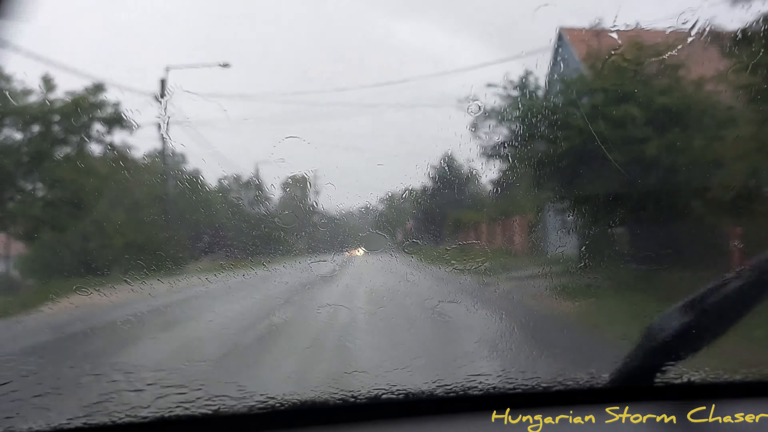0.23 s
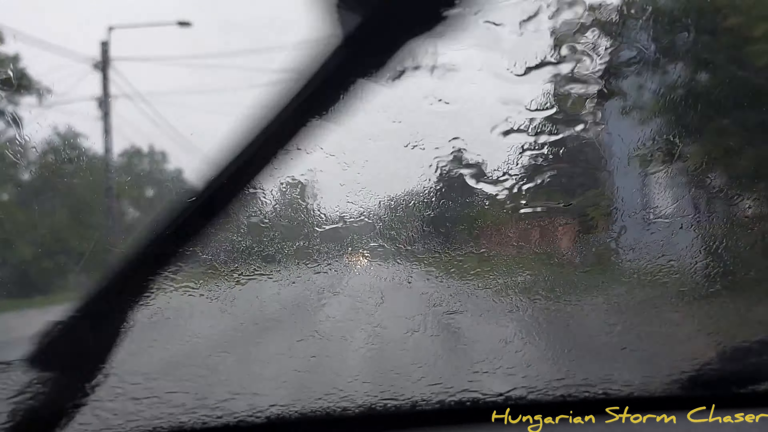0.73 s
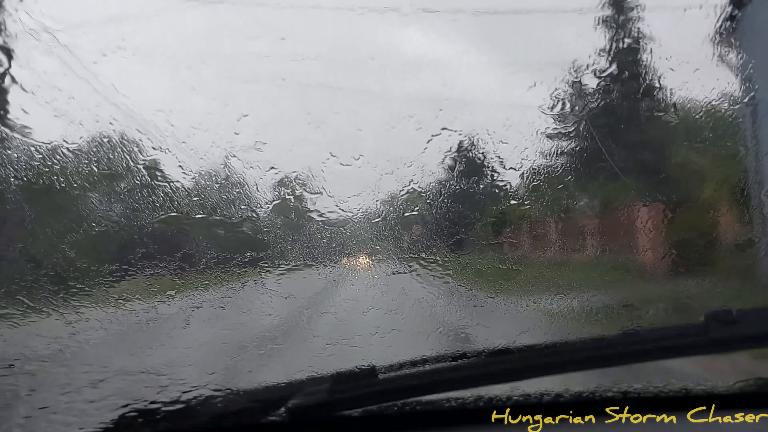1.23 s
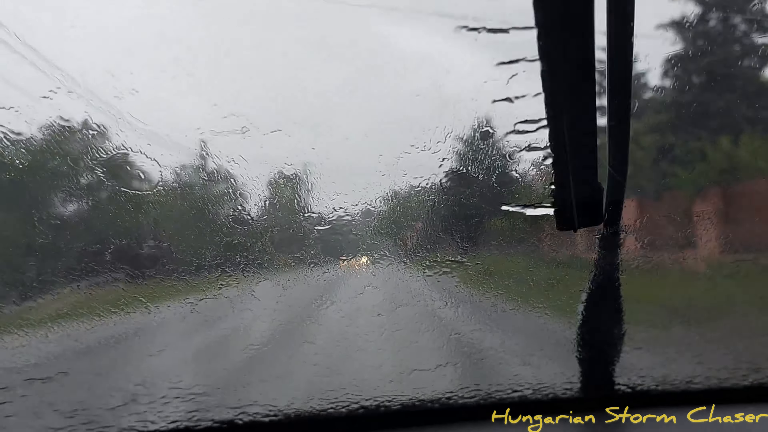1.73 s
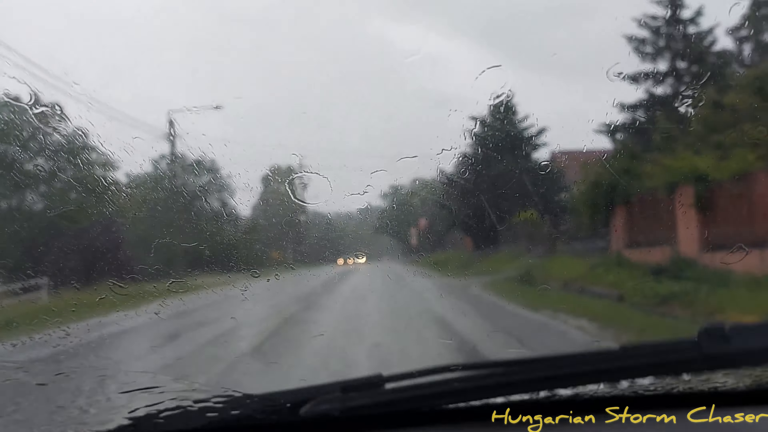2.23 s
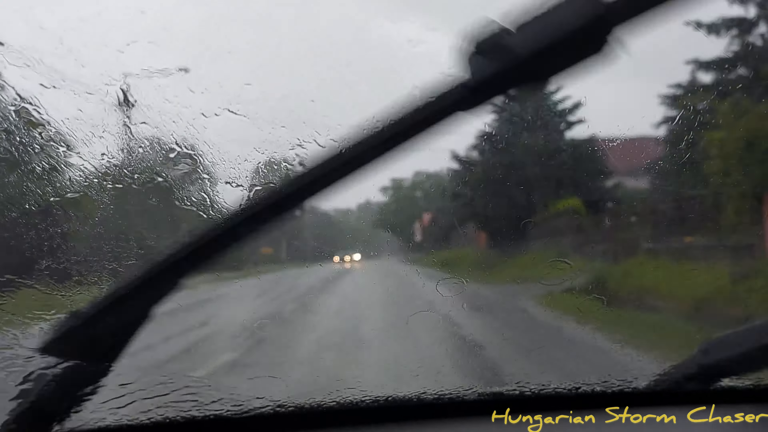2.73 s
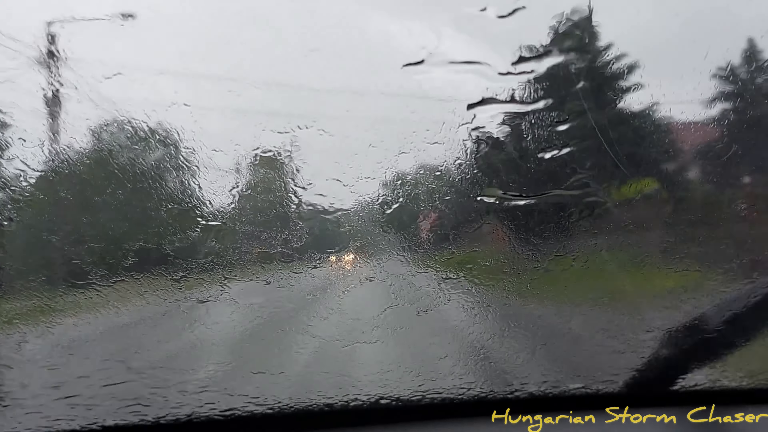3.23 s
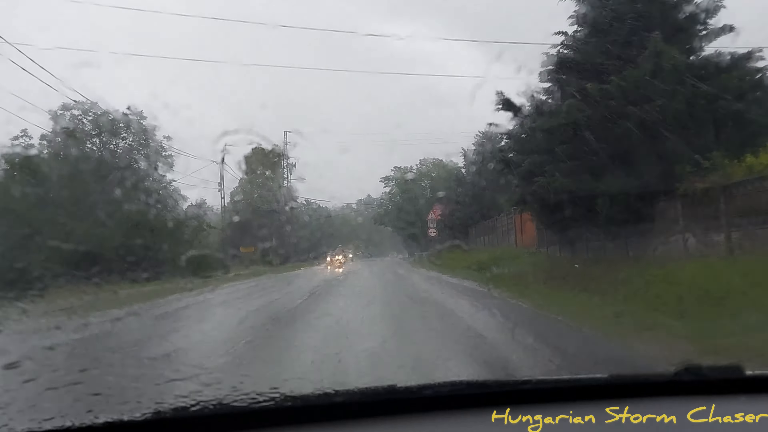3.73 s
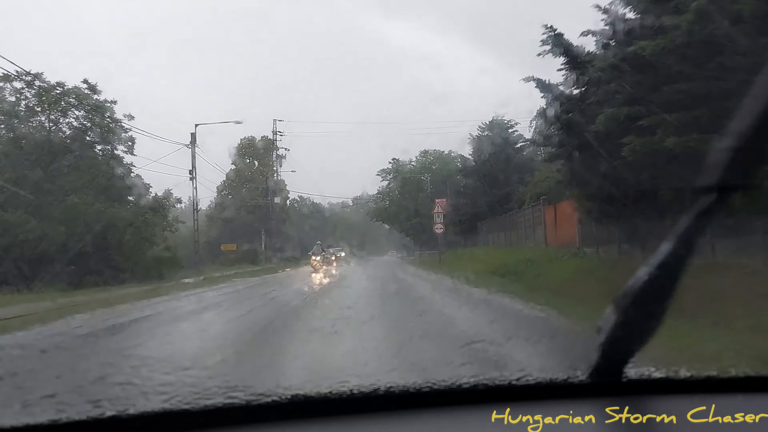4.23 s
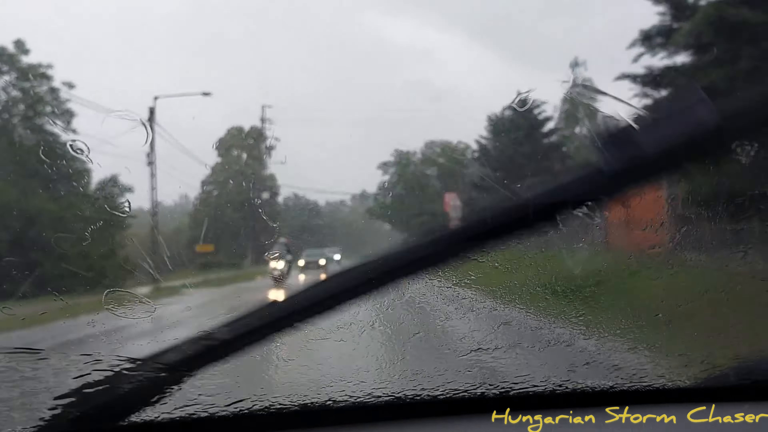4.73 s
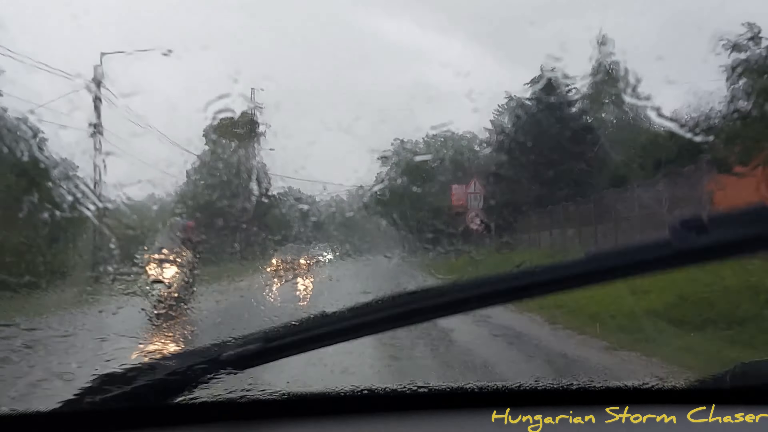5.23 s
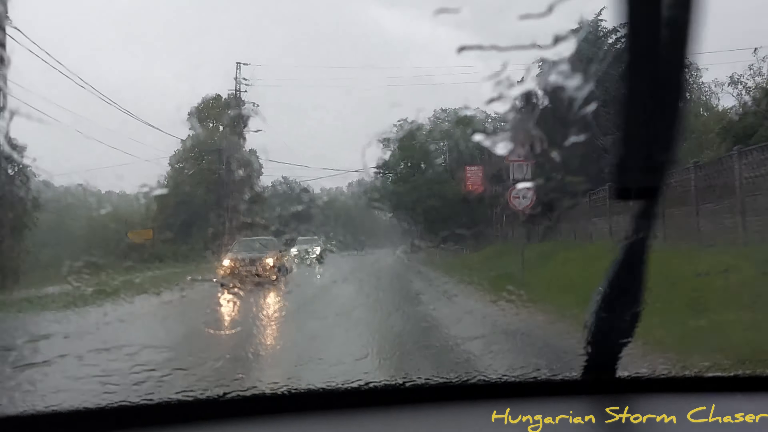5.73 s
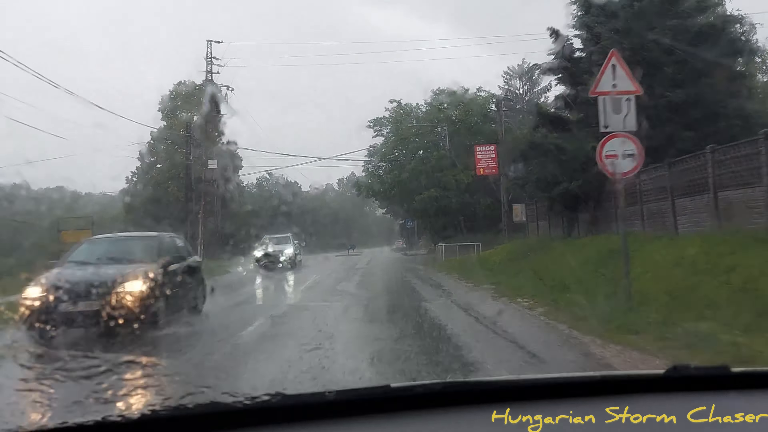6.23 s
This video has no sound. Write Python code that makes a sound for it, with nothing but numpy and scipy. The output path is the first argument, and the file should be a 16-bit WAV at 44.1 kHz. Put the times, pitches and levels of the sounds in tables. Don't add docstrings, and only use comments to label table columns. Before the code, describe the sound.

Inside a cruising car, dense raindrops crackle and tap on glass and panels above a deep engine hum, with soft hollow knocks and wiper hum.

```python
import sys
import numpy as np
from scipy import signal
from scipy.fft import rfft, irfft, next_fast_len
from scipy.io import wavfile
from scipy.ndimage import uniform_filter1d

SR = 44100
rng = np.random.default_rng(int(sys.argv[2]) if len(sys.argv) > 2 else 0)


def volts_from_db(level):
    exponent = np.asarray(level, float) / 20
    return 10 ** exponent


def to_wav(sig):
    pcm = np.clip(np.atleast_2d(sig), -1, 1) * 32767
    pcm = np.round(pcm).astype(np.int16)
    wavfile.write(sys.argv[1], SR, pcm.T)


N = 285327
TIME = np.arange(N) / SR
SIZE = next_fast_len(N + SR // 2)
FREQ = np.arange(SIZE // 2 + 1) * SR / SIZE + 1e-3


def unit(x):
    return x / np.sqrt(np.mean(x ** 2))


def curves(table):
    s, *columns = np.transpose(table)
    return [np.interp(TIME, s, column) for column in columns]


def on_freq(table):
    hz, value = np.transpose(table)
    return np.interp(np.log(FREQ), np.log(hz), value)


def walk(rate_hz):
    hold = int(SR / rate_hz)
    held = np.repeat(rng.standard_normal(N // hold + 1), hold)
    smooth = uniform_filter1d(uniform_filter1d(held, hold), hold)
    return unit(smooth[:N])


def swell(s, length_s):
    return np.maximum(1 - ((TIME - s) / length_s) ** 2, 0) ** 2


def resonances(modes):
    power = 0
    for hz, width_hz, db in modes:
        power = power + volts_from_db(2 * db) / (1 + (2 * (FREQ - hz) / width_hz) ** 2) ** 2
    return np.sqrt(power)


def scattered(per_s, level_db, spread_db):
    chance = rng.random((int(per_s * N / SR), 2))
    s = chance[:, 0] * TIME[-1]
    return s, level_db[(s * SR).astype(int)] + spread_db * (chance[:, 1] - .5)


# time in seconds [s], patter level [dB], spray minus
# patter [dB].
RAIN = [(0, -34.5, -9.5), (.18, -40, -9), (.27, -35, -9), (.5, -38, -10.5), (.85, -34.5, -8.5),
        (1.1, -38, -10), (1.35, -36.5, -11), (2.2, -37.5, -11), (2.8, -38.5, -10), (3.0, -38.5, -8.5),
        (3.55, -36, -11), (4.12, -39, -10), (4.3, -40, -11.5), (4.88, -36.5, -13.5), (4.98, -40, -11.5),
        (5.8, -40.5, -12), (6.02, -38.5, -10), (6.47, -39, -11)]
# centre [s], length [s], change [dB].
GUSTS = [(0.675, .08, 0.5), (0.906, 0.032, -2.5), (1.471, 0.038, -5), (1.75, .1, -0.5), (2.08, 0.03, -4),
         (2.277, 0.041, -4), (2.414, 0.054, 2.5), (2.606, 0.058, 1.5), (2.737, 0.053, -2),
         (2.923, 0.019, -5), (3.04, 0.12, 1), (1.99, 0.093, -1), (2.845, 0.036, -2.5), (3.42, 0.028, -0.5),
         (3.486, 0.035, -4.5), (3.58, 0.016, -1.5), (3.747, .08, -0.5), (3.98, 0.1, -0.5), (4.09, 0.087, 2),
         (4.24, 0.02, -4), (4.45, 0.04, -2), (4.55, 0.037, -6), (4.704, 0.053, 1.5), (4.815, 0.032, -3),
         (5.215, 0.032, 4), (5.44, .03, -2.5), (5.72, .05, 2), (5.78, 0.021, -9), (6.184, 0.1, -2)]


def rainfall():
    patter_db, spray_db = curves(RAIN)
    for s, length_s, change_db in GUSTS:
        patter_db = patter_db + change_db * swell(s, length_s)
    return patter_db, spray_db


def cabin(at, weight, rise_s, t60_s, left_db, right_db, lag):
    bounce_s = .0045
    energy = np.bincount(at, weight ** 2, N)
    energy = 1.1 * energy + 0.27 * np.roll(energy, int(bounce_s * SR))
    rise = np.exp(-1 / (rise_s * SR))
    decay = np.exp(-2 * np.log(1000) / (t60_s * SR))
    for pole in (rise, decay):
        energy = signal.lfilter([1 - pole], [1, -pole], energy)
    tail = np.sqrt(energy) * rng.standard_normal((2, N))
    tick = np.bincount(at, weight, N)
    direct = [volts_from_db(left_db) * tick, volts_from_db(right_db) * np.roll(tick, lag)]
    return rfft(tail + direct, SIZE)


PANELS = 6
# time in seconds [s], peak level [dB], spray minus patter [dB].
DROPS = [(0.426, -24, -13), (0.5312, -30, -19), (0.5786, -26, -17), (0.826, -32, -16), (1.3906, -34, -23),
         (1.9849, -33, -29), (2.8497, -26, -17), (2.8594, -21.5, -18), (3.2151, -37, -24),
         (3.3334, -25, -25), (3.416, -25, -5.5), (3.706, -30, -20), (4.0173, -29, -21),
         (4.0851, -22.5, -18), (4.2567, -22, -20), (4.34, -24, -19), (4.4803, -18.5, -22),
         (4.535, -27, -28), (4.6196, -30, -21), (4.8394, -33, -19), (4.9074, -19, -18), (5.3807, -33, -11),
         (5.3957, -21.5, -28), (5.471, -28, -10), (5.7856, -23, -19), (5.8057, -30, -20),
         (5.8726, -22.5, -19), (5.9075, -27, -27), (5.9188, -20.5, -26), (6.3804, -21, -26)]


def drops(patter_db, spray_db):
    chance = rng.random((int(1500 * N / SR), 5))
    at = (chance[:, 0] * N).astype(int)
    size_db = 3.0 * np.minimum(-np.log(1 - chance[:, 1]), 3.4)
    size = volts_from_db(size_db) * np.sign(chance[:, 2] - .5)
    size = size / np.sqrt(np.sum(size ** 2) / N)
    size = size * volts_from_db(0.44 * walk(35))[at]
    patter = size * volts_from_db(patter_db[at])
    spray = patter * volts_from_db(spray_db[at]) * unit(volts_from_db(8.3 * (chance[:, 3] - .5)))
    panel = (chance[:, 4] * PANELS).astype(int)

    s, peak_db = scattered(7, patter_db + 7.5, 7)
    lesser = np.array([s, peak_db, np.full(len(s), -30)])
    s, peak_db, bright_db = np.hstack([np.transpose(DROPS), lesser])
    at = np.concatenate([at, (s * SR).astype(int)])
    patter = np.concatenate([patter, volts_from_db(peak_db + 13.0)])
    spray = np.concatenate([spray, volts_from_db(peak_db + bright_db + 19.5)])
    panel = np.concatenate([panel, np.arange(len(s)) % PANELS])
    return at, patter, spray, panel


# time in seconds [s], peak [dB].
TICKS = [(0.2618, -28), (0.3015, -27), (0.3551, -31), (0.4256, -28), (0.5312, -28), (0.5781, -31),
         (0.6155, -30), (0.641, -25), (0.7673, -25), (0.8485, -37), (0.9218, -30), (1.3199, -28),
         (1.9849, -31), (2.1085, -31), (2.3067, -30), (2.6534, -33), (2.9447, -33), (3.182, -29),
         (3.4165, -25), (3.5975, -28), (4.018, -29), (4.3131, -29), (4.4787, -30), (4.7132, -34),
         (4.8394, -29), (5.3807, -33), (5.5227, -29.5), (5.7852, -34), (6.179, -29), (6.2313, -25)]


def glass_ticks(patter_db):
    s, peak_db = np.hstack([np.transpose(TICKS), scattered(24, patter_db + 5.5, 10)])
    at = (s * SR).astype(int)
    return cabin(at, volts_from_db(peak_db + 19.5), .0003, 0.018, 4.0, -6.0, lag=24)


# frequency [Hz], level [dB per Hz].
LEFT = [(250, -4.5), (400, 5.5), (700, -2.5), (1000, -6.5), (1900, -8.5), (2700, -1), (3300, -8.5),
        (3800, -9.5), (5500, -12), (7300, -17.5), (9600, -27.5), (11500, -26.5), (13000, -28.5),
        (15800, -34)]
RIGHT = [(250, 15), (450, 4.5), (700, 2), (1000, -2.5), (2000, 0), (3200, -2.5), (4300, -1), (5500, -13),
         (7000, -8.5), (7600, -14), (8700, -25.5), (10500, -19.5), (12800, -17), (15800, -20)]


def rain():
    patter_db, spray_db = rainfall()
    at, patter, spray, panel = drops(patter_db, spray_db)
    treble = 1 / (1 + (7800 / FREQ) ** 8)
    out = treble * volts_from_db(15.5) * cabin(at, spray, 0.00049, 0.033, -9.5, -9, lag=24)
    little_body = (1 + 0.69 * treble) / (1 + (4200 / FREQ) ** 2)
    out = out + glass_ticks(patter_db) * little_body
    for p in range(PANELS):
        note = 1 + 0.39 * resonances([(1500 * 1.3 ** p, 500, 0)])
        mine = panel == p
        body = cabin(at[mine], patter[mine], .0006, .036, -3.5, -4, lag=22)
        out = out + (1 - treble) * note * body
    ports = volts_from_db(np.array([on_freq(LEFT), on_freq(RIGHT)]) + 10.5)
    ports = ports / (1 + (500 / FREQ) ** 2)
    return irfft(out * ports, SIZE)[:, :N]


# time in seconds [s], peak level [dB], pitch [Hz].
KNOCKS = [
    (0.7, -25, 520),
    (0.878, -24, 660),
    (1.303, -22, 630),
    (2.117, -16.5, 780),
    (3.47, -33, 746),
    (4.134, -21, 825),
    (4.755, -30, 560),
]


def knocks():
    out = np.zeros(N)
    for s, db, hz in KNOCKS:
        t = np.maximum(TIME - s, 0)
        out += volts_from_db(db - 1) * np.sin(2 * np.pi * hz * t) * np.exp(-np.log(1000) * t / 0.036)
    return np.array([volts_from_db(-5.5) * out, np.roll(out, 22)])


CRUISE_DB = -25
# time in seconds [s], firing tone [dB].
LOAD = [
    (0, -24),
    (.7, -25.5),
    (1.5, -26.5),
    (2.0, -26.5),
    (2.3, -26.5),
    (3.8, -25.5),
    (4.5, -27),
    (4.75, -29),
    (5.5, -33),
    (6.47, -28.5),
]


def load_db():
    return curves(LOAD)[0] - CRUISE_DB


# time in seconds [s], firing rate [Hz].
REVS = [(0, 56.55), (1.0, 56.4), (2.0, 56.35), (2.6, 56.6), (3.4, 56.8), (4.2, 56.9), (5.0, 56.75),
        (6.5, 56.75)]
ORDER_LAG = (0, 1.75, 3.1)
ORDER_DB = (0.5, -6.5, -13.5)
ORDER_SLOPE = (0.97, 0.48, 0.84)


def engine():
    turn = 2 * np.pi * np.cumsum(curves(REVS)[0]) / SR
    out = 0
    for k, lag in enumerate(ORDER_LAG):
        db = CRUISE_DB + ORDER_DB[k] + ORDER_SLOPE[k] * load_db()
        db = db + (0.5 + 0.94 * k) * walk(5.6)
        ports = np.array([[-.15], [0]]) * (k == 0)
        wave = np.cos((k + 1) * turn + lag + ports + 0.066 * walk(2.1))
        out = out + np.sqrt(2) * volts_from_db(db) * wave
    return out * volts_from_db(np.array([[-1.0], [1.0]]))


# frequency [Hz], left-right correlation [0-1].
LIKENESS = [(40, 0.96), (130, 0.97), (290, 0.79), (640, 1), (1200, 0)]


def stereo_noise(gain):
    alike = np.clip(on_freq(LIKENESS), 0, 1)
    mid, side = rfft(rng.standard_normal((2, SIZE)))
    side = side * np.sqrt((1 - alike) / (1 + alike))
    return unit(irfft(gain * np.array([mid + side, mid - side]), SIZE)[:, :N])


def steady(x):
    power = uniform_filter1d(np.mean(x ** 2, axis=0), int(.03 * SR))
    return unit(x / (power + 0.12) ** (.75 / 2))


# frequency [Hz], width [Hz], level [dB].
SHELL = [(29, 16, -23.5), (51.6, 4.5, -4.5), (71.4, 5.4, -4.5), (83.24, 3.4, 1), (96.4, 7.6, -5)]
UPPER = [(114.1, 14, 5.5), (133.9, 27, -6.5), (155.8, 13.6, -11.5), (240.8, 40, -16)]
# frequency [Hz], level [dB per Hz].
ROAR = [(100, -25), (175, 1), (198, -3), (243, -5), (290, -8.5), (440, -8), (552, -15.5), (855, -18),
        (1050, -27), (1170, -18.5), (1300, -27), (1690, -24), (2860, -120)]
# centre [s], length [s], low shell boom [dB], upper boom [dB].
PATCHES = [(0.15, 0.12, -43, -29), (0.41, 0.35, -33, -43), (.7, 0.079, -28, -22.5), (1.244, 0.27, -30, -30),
           (1.5, 0.34, -38, -28.5), (1.775, 0.094, -24, -20), (1.83, 0.15, -26, -22),
           (2.068, 0.11, -26.5, -29), (2.23, 0.29, -27.5, -33), (2.732, 0.083, -40, -26.5),
           (2.9, 0.16, -32, -34), (3.2, 0.29, -28, -24.5), (3.413, 0.27, -27.5, -24.5),
           (3.588, .08, -34, -19), (3.855, 0.17, -29, -22), (4.004, 0.049, -23, -19.5),
           (4.197, 0.12, -26, -24.5), (4.43, 0.082, -26.5, -21.5), (4.574, 0.12, -46, -23),
           (4.961, 0.089, -19, -16), (5.033, 0.14, -34, -16.5), (5.127, 0.093, -17.5, -18),
           (5.214, 0.064, -21, -16.5), (5.36, 0.16, -25, -20.5), (5.46, 0.16, -25, -25),
           (5.646, 0.15, -27.5, -24.5), (5.933, 0.064, -26, -31), (6.264, 0.075, -32, -49),
           (6.422, 0.11, -37, -24.5)]


def road():
    shell, upper = volts_from_db(-35.5) ** 2, volts_from_db(-30) ** 2
    for s, length_s, shell_db, upper_db in PATCHES:
        bump = swell(s, length_s)
        shell = shell + (volts_from_db(shell_db) * bump) ** 2
        upper = upper + (volts_from_db(upper_db) * bump) ** 2
    boom = np.sqrt(shell) * steady(stereo_noise(resonances(SHELL)))
    boom = boom + np.sqrt(upper) * volts_from_db(-3.5) * steady(stereo_noise(resonances(UPPER)))
    tyre_air = stereo_noise(resonances([(239.4, 36, 0)]))
    boom = boom + np.sqrt(upper) * volts_from_db(-21) * tyre_air
    roar_db = -34.5 + 0.24 * load_db() + 1.0 * walk(14)
    roar = volts_from_db(roar_db) * stereo_noise(volts_from_db(on_freq(ROAR)))
    return (boom + roar) * volts_from_db(np.array([[-.9], [.9]]))


# centre [s], length [s], hum [Hz], level [dB].
WIPES = [
    (.5, .4, 82.2, -29),
    (1.349, 0.45, 83.4, -31),
    (2.051, 0.5, 82.2, -31.5),
    (3.1, 0.59, 82.8, -30),
    (3.851, .4, 72.9, -35),
    (4.55, 0.42, 72.8, -32.5),
    (5.901, .5, 74.3, -33.5),
]


def wiper():
    waver = 0.5 * walk(5)
    out = np.zeros(N)
    for s, length_s, hz, db in WIPES:
        hum = np.sin(2 * np.pi * hz * (TIME - s) + waver)
        out += volts_from_db(db) * swell(s, length_s) * hum
    return np.sqrt(2) * out * volts_from_db(np.array([[-.9], [.9]]))


def scene():
    return rain() + knocks() + engine() + road() + wiper()


def low_pass(x):
    return signal.sosfilt(signal.butter(12, 16320, fs=SR, output="sos"), x)


def record(dry):
    rounded = np.tanh(1.6 * dry) / 1.6
    top_cut = signal.ellip(12, .2, 70, 15880, fs=SR, output="sos")
    mix = signal.sosfilt(top_cut, rounded)
    return low_pass(mix)


dry = scene()
out = record(dry)
to_wav(out)
```